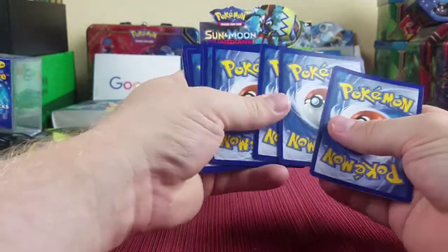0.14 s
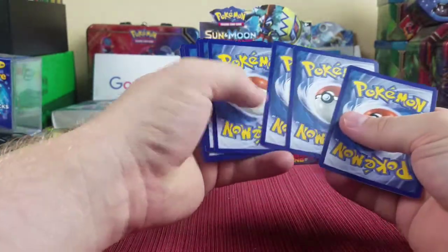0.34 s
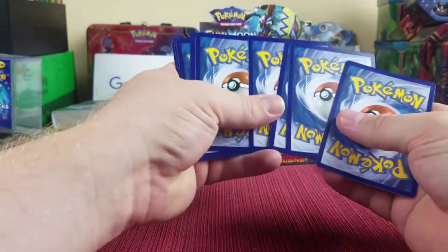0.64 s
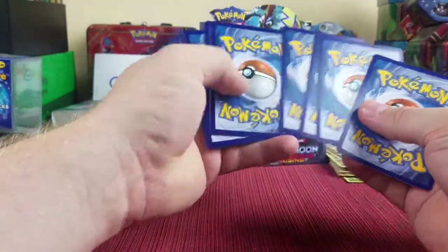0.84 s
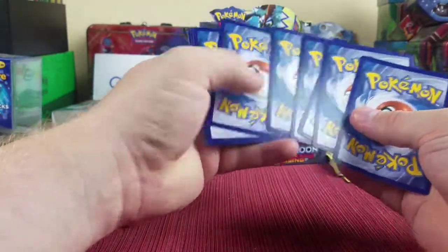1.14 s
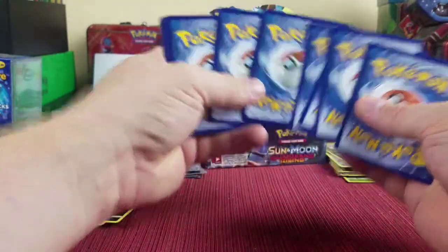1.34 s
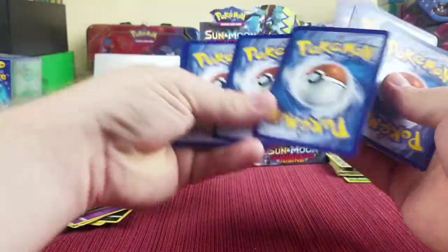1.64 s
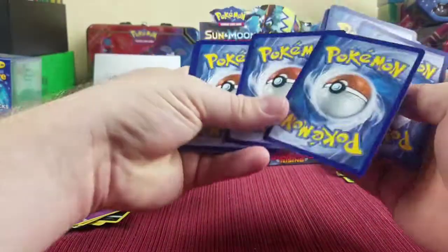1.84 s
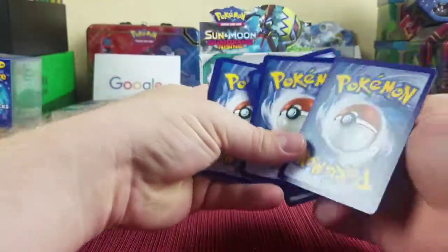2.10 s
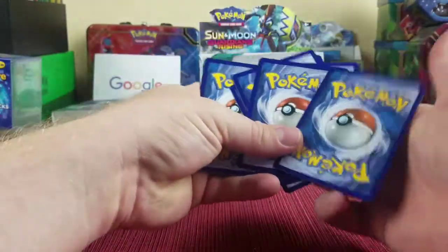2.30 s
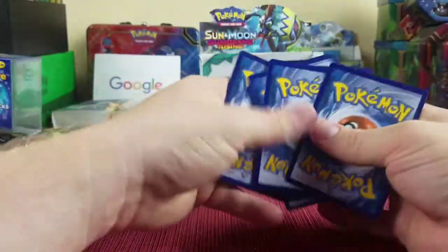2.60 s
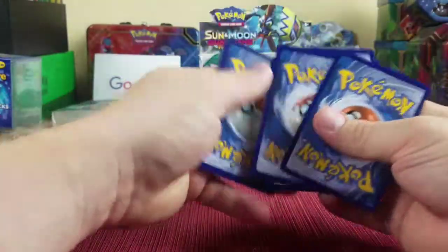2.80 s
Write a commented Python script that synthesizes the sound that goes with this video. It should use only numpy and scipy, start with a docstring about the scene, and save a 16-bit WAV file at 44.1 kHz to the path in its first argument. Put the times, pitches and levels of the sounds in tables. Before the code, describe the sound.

Close, light snaps and rustles of handled trading cards, with a fan humming behind.

```python
"""Trading cards, passed between two hands along a small fan of cards, close to the microphone.
A thumb slides single cards with a fine hiss. Two packets knock together, rub face to face with a
rising whistle and catch at their edges. Each tap rings the held cards briefly, at a pitch set by
the grip. Behind them, a fan hums low in a quiet, furnished room."""
import sys
import numpy as np
from scipy import signal
from scipy.fft import rfft, irfft
from scipy.io import wavfile
from scipy.ndimage import uniform_filter1d

SR = 44100
rng = np.random.default_rng(int(sys.argv[2]) if len(sys.argv) > 2 else 0)


def output_pcm(signal):
    """Save a mono or channel-first signal as 16-bit PCM at the path in sys.argv[1].

    Samples are clipped to [-1, 1] before scaling.
    """
    pcm = np.clip(np.atleast_2d(signal).T, -1, 1) * 32767
    wavfile.write(sys.argv[1], SR, np.round(pcm).astype(np.int16))


N = 130095

# Hand strokes. Each row: time of peak speed, rise and fall in seconds, level in dB.
CARD_SLIDES = [(.074, 0.021, 0.027, -49.5), (.102, 0.018, 0.047, -55), (.642, 0.035, 0.024, -51),
               (.715, 0.033, 0.024, -61.5), (1.02, 0.023, 0.042, -49), (1.095, 0.039, 0.033, -59),
               (1.314, 0.022, .045, -54.5), (1.455, 0.02, 0.035, -50.5), (1.495, 0.021, 0.039, -53.5),
               (2.35, 0.019, 0.027, -57), (2.77, 0.1, 0.045, -58.5), (2.945, 0.026, .04, -53.5)]
PACKET_RUBS = [(.085, 0.04, 0.052, -55.5), (.645, .035, 0.076, -64.5), (1.48, 0.069, 0.068, -58),
               (1.808, 0.0081, 0.015, -48.5), (1.85, 0.041, 0.065, -56.5), (2.09, 0.084, 0.065, -45.5),
               (2.163, 0.012, 0.04, -47.5), (2.23, 0.024, 0.027, -55.5), (2.307, 0.018, 0.019, -48),
               (2.437, 0.0073, 0.011, -49), (2.6, 0.04, 0.033, -52.5), (2.67, 0.026, 0.025, -56.5),
               (2.74, 0.037, 0.098, -63.5)]
# Edge stick-slip. Each row: time of peak force, rise and fall in seconds, level in dB,
# resonance in Hz, left-right offset from EDGE_LEFT_DB in dB.
EDGE_SCRAPES = [(2.304, 0.028, 0.012, -54.5, 1660, 10.5), (2.413, 0.01, 0.009, -45, 1950, 2),
                (2.4362, 0.0021, 0.0064, -47, 2500, 1), (2.6, 0.0046, 0.011, -51, 1620, 4),
                (2.672, 0.014, 0.0075, -45.5, 1620, 2.5), (2.726, 0.0054, 0.0049, -43.5, 2900, 3)]
# Taps and snaps. Each row: start in seconds, ring level in dB, ring pitch in Hz, crack level in dB,
# crack tilt in dB per octave, left-right offset from EDGE_LEFT_DB in dB.
CARD_SNAPS = [(0.365, -41.5, 590, -46, 0, 5), (0.401, -46.5, 3150, -50, -2.5, 8),
              (1.193, -44, 1660, -56, -6, 5), (1.340, -40, 1034, -40, -4.5, -3),
              (1.342, -37.5, 482, -51, -8, 3), (1.533, -37.5, 1155, -35.5, -5.5, -1),
              (1.537, -27.5, 404, -44, -5.5, 1), (1.748, -29, 904, -29, -3, 0),
              (1.749, -33.5, 573, -52, -8, 4), (1.773, -48, 1400, -32.5, 1, 3),
              (1.7973, -31, 1390, -27, 1, 1.5), (2.434, -40.5, 970, -37, -0.5, 3.5),
              (2.564, -48, 546, -42.5, -2.5, 2), (2.640, -41, 2070, -40, -2.5, -1),
              (2.665, -41, 1330, -44, -1.5, -3), (2.725, -40.5, 983, -50, 0, 0)]
# Modes of the held cards. Each row: ratio to ring pitch, gain in dB, T60 in seconds.
HELD_CARD_MODES = [(.78, -11.5, 0.031), (1, -1.5, 0.023), (1.45, -21, 0.048), (2.3, -18, 0.021),
                   (3.2, -18, 0.017)]
# First a faint, breathy resonance near 1.4 and 3.7 kHz, then rising whistles of cards rubbing together.
# Each row: peak time, rise and fall in seconds, level in dB, pitch in Hz,
# glide in octaves per second, bandwidth in Hz.
WHISTLES = [ (.48, .05, 0.044, -67, 3730, .1, 260), (1.809, .003, 0.0045, -48, 9870, 1, 700),
            (2.095, 0.06, 0.058, -52, 4000, 1.6, 590), (2.414, .008, 0.0072, -54.5, 13430, 1, 630),
            (2.716, .028, .011, -57, 2850, 2.5, 260), ]
# Resonances of each whistle. Each row: ratio to its pitch, gain in dB.
WHISTLE_MODES = [(.37, -9), (.66, -9.5), (1, -0.5)]
# Swell of the main hum tone. Each row: time in seconds, level in dB.
FAN_SWELL = [(.15, -52), (.38, -40.5), (.95, -45), (1.7, -47.5), (1.9, -37), (2.0, -62), (2.28, -50),
             (2.45, -44), (2.63, -35.5), (2.76, -53), (2.92, -42)]
# Weaker hum tones. Each row: frequency in Hz, level in dB.
FAN_TONES = [(64.6, -52.5), (147, -50.5), (239, -54)]
# Source spectra and microphone port responses. Each row: frequency in Hz, relative gain in dB.
SLIDE_SPECTRUM = [(900, -7.5), (2000, -4.5), (4500, -6.5), (6500, -5.5), (9000, -1), (12000, 1), (15000, 1)]
RUB_SPECTRUM = [(250, -1.5), (700, -12.5), (1500, 0), (2700, 2), (4100, 1), (5200, -1.5), (8500, -4),
                (15000, -7.5)]
SCRAPE_SPECTRUM = [(250, -32), (500, 5), (750, -10), (1000, 3.5), (2500, 2.5), (4200, -6), (5500, -9.5),
                   (15000, -10)]
CRACK_SPECTRUM = [(150, -49.5), (400, 4.5), (700, 1), (1200, 4.5), (2600, 1.5), (4200, 6), (5500, -8.5),
                  (9000, -5), (15000, -9.5)]
RUMBLE_SPECTRUM = [(20, -42.5), (35, -14.5), (50, -15), (63, -5), (88, -10), (115, -5), (143, -3),
                   (178, -3), (200, -7.5), (240, -8.5), (290, -10.5), (340, -23), (480, -29), (750, -45.5),
                   (2000, -71)]
AIR_SPECTRUM = [(100, -11.5), (500, 2.5), (750, -2.5), (920, -3), (1100, 0), (1400, 2), (1900, -2),
                (3800, -8), (4700, -12), (9000, -18.5), (15000, -18)]
LEFT_PORT_RESPONSE = [(200, -0.5), (1000, 3), (1400, 1), (2300, -1), (7500, -2.5), (9800, 2), (12000, -1),
                      (15000, -1)]
RIGHT_PORT_RESPONSE = [(110, -1), (350, -2), (1000, -1.5), (1400, -6.5), (2300, -3.5), (7500, -3.5),
                       (10000, -7), (13300, 3), (15000, -8)]

EDGE_LEFT_DB = -1  # base pan of snaps, scrapes and whistles


def slides():
    """Smooth card faces hiss as the thumb pushes one across."""
    hiss = unit(colour(friction(slips_per_s=16000, grain_db=1, likeness=0.26), SLIDE_SPECTRUM))
    envelope = sum(stroke(*row) for row in CARD_SLIDES)
    return hiss * envelope * amp(1.3 * walk(rate_hz=120)) * pan(left_db=3)


def rubs():
    """Whole packets rub with a fuller, coarser rustle."""
    rustle = unit(colour(friction(slips_per_s=15000, grain_db=1, likeness=0.27), RUB_SPECTRUM))
    envelope = sum(stroke(*row) for row in PACKET_RUBS)
    return rustle * envelope * amp(walk(rate_hz=120)) * pan(left_db=2)


def snaps(size=4096, crack_s=0.0013, tail_s=0.014, ring_rise_s=0.00066, port_lag_s=0.00007):
    """A card lands or flicks free: one click, a brief crackle and a short ring."""
    out, t = np.zeros((2, N + size)), np.arange(size) / SR
    fade = amp(-19) * np.exp(-t / crack_s) + amp(-31) * np.exp(-t / tail_s)
    attack = 1 - np.exp(-t / ring_rise_s)
    for start_s, ring_db, hz, crack_db, tilt_db_per_oct, left_db in CARD_SNAPS:
        burst = (t == 0) + two_ports(rng.standard_normal((3, size)), likeness=0.3) * fade
        crack = unit(colour(burst, CRACK_SPECTRUM, tilt_db_per_oct * octaves(2 * size)))
        crack *= np.sqrt(crack_s * SR / size / 2)  # energy of a unit decay over crack_s
        ring = sum((-1) ** k * amp(db - 60 * t / t60_s) * np.sin(2 * np.pi * hz * ratio * t)
                   for k, (ratio, db, t60_s) in enumerate(HELD_CARD_MODES))
        left, right = (amp(ring_db) * ring * attack + amp(crack_db) * crack) * pan(left_db + EDGE_LEFT_DB)
        start, lag = int(start_s * SR), int(port_lag_s * SR)
        out[0, start + lag:start + lag + size] += left
        out[1, start:start + size] += right
    return out[:, :N]


def scrapes(boost_db=8.5, half_width_oct=0.29):
    """An edge chatters over other edges and sounds the card's resonance."""
    slips, out = friction(slips_per_s=2500, grain_db=0, likeness=0.67), 0
    for peak_s, rise_s, fall_s, db, hz, left_db in EDGE_SCRAPES:
        force = stroke(peak_s, rise_s, fall_s, db)
        resonance_db = boost_db / (1 + ((octaves(2 * N) - np.log2(hz)) / half_width_oct) ** 2)
        chatter = unit(colour(slips * force, SCRAPE_SPECTRUM, resonance_db))
        out += chatter * np.sqrt(np.mean(force ** 2)) * pan(left_db + EDGE_LEFT_DB)
    return out


def whistles():
    """Narrow noise bands glide up together: one faint and breathy, then the whistle of rubbing cards."""
    t, out = np.arange(N) / SR, 0
    for peak_s, rise_s, fall_s, db, hz, glide_oct_per_s, width_hz in WHISTLES:
        noise = two_ports(rng.standard_normal((3, N)) + 1j * rng.standard_normal((3, N)), likeness=0.34)
        flutter = signal.sosfilt(signal.butter(2, width_hz / 2, fs=SR, output="sos"), noise)
        pitch_hz = hz * 2 ** (glide_oct_per_s * np.clip(t - peak_s, -2 * rise_s, 2 * fall_s))
        phase = 2 * np.pi * np.cumsum(pitch_hz) / SR
        ring = 0
        for k, (ratio, mode_db) in enumerate(WHISTLE_MODES):
            drive = np.roll(flutter, k * SR, axis=1)  # shift decorrelates the modes
            ring += amp(mode_db) * unit((drive * np.exp(1j * ratio * phase)).real)
        out += ring * stroke(peak_s, rise_s, fall_s, db)
    return out * pan(EDGE_LEFT_DB)


def friction(slips_per_s, grain_db, likeness):
    """Dense tiny slips of uneven size; grain_db widens the spread."""
    slipping = rng.random(N) < slips_per_s / SR
    sizes = slipping * amp(grain_db * np.minimum(rng.exponential(size=N), 5))
    return unit(two_ports(rng.standard_normal((3, N)), likeness) * sizes)


def stroke(peak_s, rise_s, fall_s, db):
    """Envelope of a movement that gathers speed and dies away."""
    t = np.arange(N) / SR - peak_s
    return amp(db) * np.exp(-np.abs(t / np.where(t < 0, rise_s, fall_s)) ** 2.03)


def room(x, t60_s=0.43, gap_s=0.003, damping_hz=6900):
    """Adds the short, soft reflections of a furnished room."""
    t = np.arange(SR // 2) / SR
    tail = rng.standard_normal((2, len(t))) * amp(-60 * t / t60_s) * (t > gap_s)
    tail /= np.sqrt(np.sum(tail ** 2) / 2)
    tail = signal.sosfilt(signal.butter(1, damping_hz, fs=SR, output="sos"), tail)
    return x + amp(-10.5) * signal.fftconvolve(x, tail, axes=1)[:, :N]


def fan_hum(main_hz=174.6):
    """A fan in the room: low rumble, wavering tones and a thin rush of air."""
    mid, side, left, right = rng.standard_normal((4, N))
    rumble = unit(colour(mid + amp(-11) * side * np.array([[1], [-1]]), RUMBLE_SPECTRUM))
    swell_db = np.interp(np.arange(N) / SR, *np.array(FAN_SWELL).T)
    tones = fan_tone(main_hz, swell_db) + sum(fan_tone(hz, db) for hz, db in FAN_TONES)
    air = unit(colour(np.array([left, right]), AIR_SPECTRUM))
    return amp(-39.5) * rumble + tones + amp(-60) * air * pan(left_db=-2.5)


def fan_tone(hz, db, wander_hz=1.507, wander_db=1.22):
    """One hum tone, wavering in level and pitch."""
    rms = amp(db + wander_db * walk(rate_hz=6))
    pitch_hz = hz + wander_hz * walk(rate_hz=9)
    return rms * np.sqrt(2) * np.sin(2 * np.pi * np.cumsum(pitch_hz) / SR)


def amp(db):
    """Decibels to gain."""
    return 10 ** (np.asarray(db) / 20)


def unit(x):
    """Scale to rms 1."""
    return x / np.sqrt(np.mean(x ** 2))


def pan(left_db):
    """Left and right gains for a level difference."""
    return amp(np.array([[left_db], [-left_db]]) / 2)


def octaves(size):
    """FFT bin frequencies in octaves above 1 Hz."""
    return np.log2(np.maximum(np.arange(size // 2 + 1) * SR / size, 1))


def colour(x, points, extra_db=0):
    """Minimum-phase filter through (Hz, dB) points."""
    size = 2 * x.shape[-1]
    hz, db = np.array(points).T
    gain_db = np.interp(octaves(size), np.log2(hz), db) + extra_db
    cepstrum = irfft(np.log(amp(gain_db)))
    cepstrum[1:size // 2] *= 2
    cepstrum[size // 2 + 1:] = 0
    return irfft(rfft(x, size) * np.exp(rfft(cepstrum)))[..., :size // 2]


def walk(rate_hz):
    """Smooth random drift, rms 1."""
    hold = int(SR / rate_hz)
    steps = np.repeat(rng.standard_normal(N // hold + 1), hold)
    return unit(uniform_filter1d(uniform_filter1d(steps, hold), hold)[:N])


def two_ports(noise, likeness):
    """Three independent noises to left and right with correlation `likeness`."""
    return np.sqrt(likeness) * noise[0] + np.sqrt(1 - likeness) * noise[1:]


def scene():
    """Cards in the room, over the hum."""
    return room(slides() + rubs() + scrapes() + whistles() + snaps()) + fan_hum()


def record(dry):
    """Each microphone port has its own treble resonance; the top is cut steeply."""
    cutoff_hz = 14550
    heard = np.array([colour(dry[0], LEFT_PORT_RESPONSE), colour(dry[1], RIGHT_PORT_RESPONSE)])
    return signal.sosfilt(signal.ellip(14, .2, 80, cutoff_hz, fs=SR, output="sos"), heard)


dry = scene()
out = record(dry)
output_pcm(out)
```